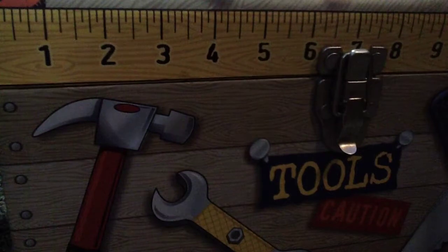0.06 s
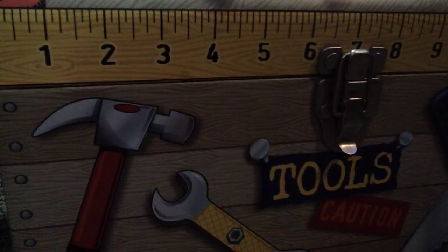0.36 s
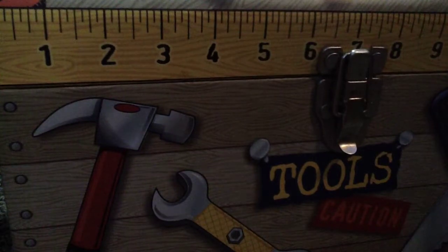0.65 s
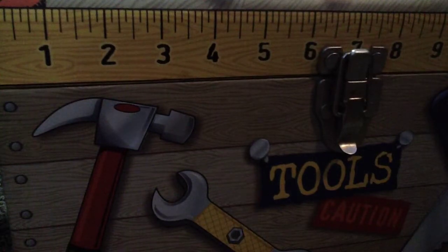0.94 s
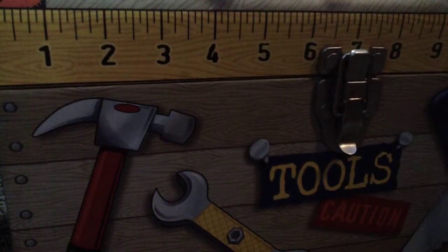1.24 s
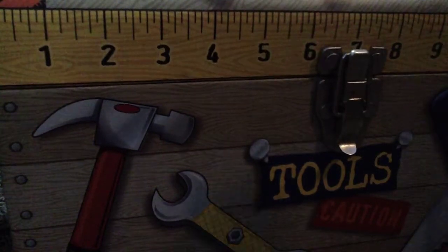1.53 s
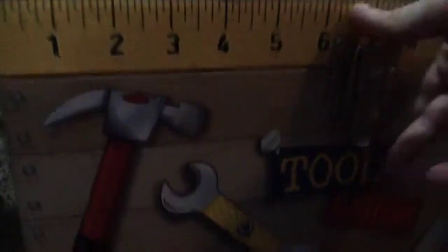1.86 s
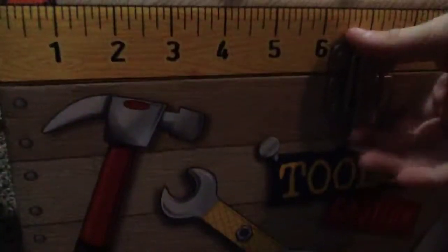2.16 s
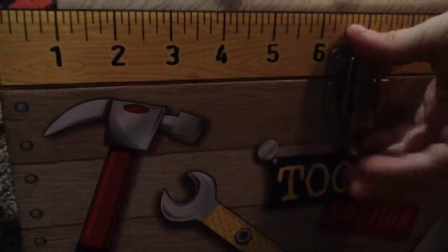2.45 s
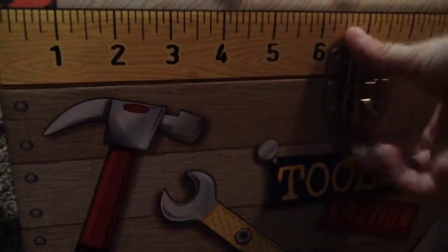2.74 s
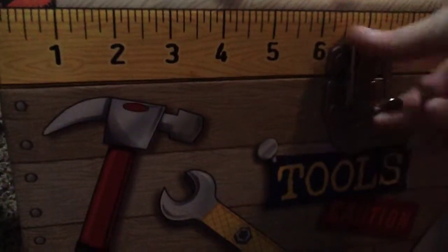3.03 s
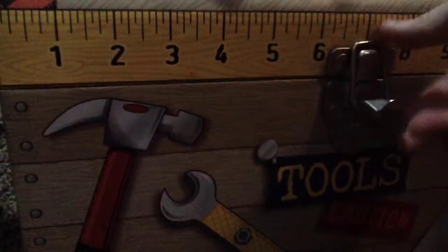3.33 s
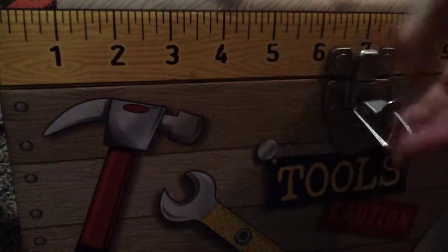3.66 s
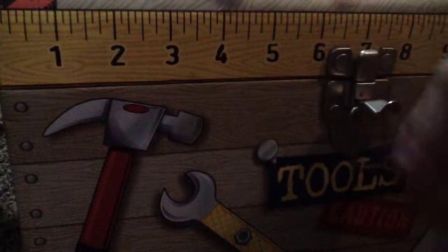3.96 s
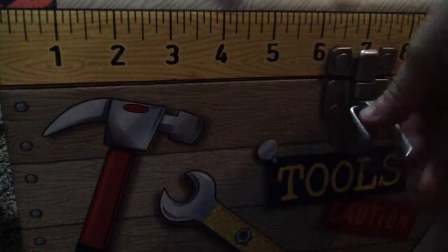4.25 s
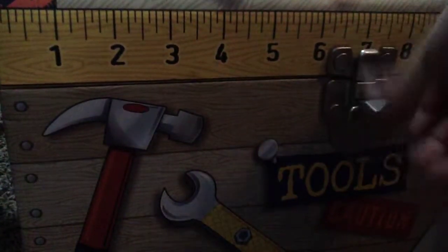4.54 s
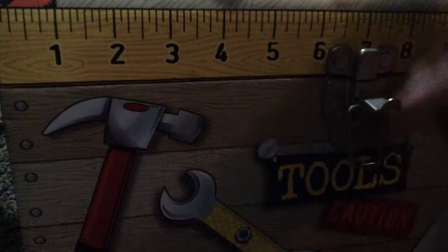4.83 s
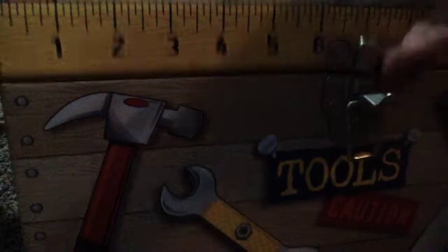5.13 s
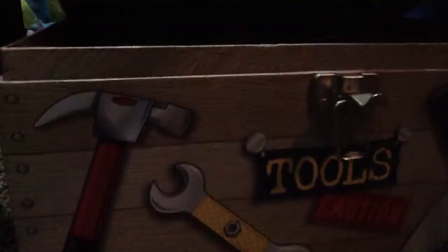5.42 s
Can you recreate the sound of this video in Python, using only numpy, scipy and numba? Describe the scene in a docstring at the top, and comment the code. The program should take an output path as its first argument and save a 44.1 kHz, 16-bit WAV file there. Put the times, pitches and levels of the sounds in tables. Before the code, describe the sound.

A low, steady hiss of a quiet room runs throughout, with very faint high whirs near the start and end. A hand bumps a hollow wooden box softly, most clearly at about 0.7 seconds. Around 1.7 seconds a tiny creak ends in a click from the box's metal latch. From 2.1 to 3.3 seconds fingers work the latch, making uneven damped ticks, short scrapes and rattles mixed with dull wooden knocks, busiest near 2.5 seconds. At 3.4 seconds the latch snaps free with a loud, sharp crack and a brief bright ring. After a few light ticks, two more loud snaps come close together at about 4.2 and 4.3 seconds. From 4.4 to 5 seconds there are softer clicks, bumps and a light brush of skin over the lid. A faint knock and rub follow near 5.4 seconds. Everything sounds close and dry.

```python
"""Steel latch on a wooden box

A hand works the draw latch of a toy box in a quiet room. Held by the fingers, the steel is damped: it
ticks, scrapes, rattles in its slack and creaks once by stick-slip. Snapping free, it rings in its modes.
These contacts also drive the panels and air of the hollow box. Soft knocks and a brush over the lid lie
between, above a hiss with faint whirs; a gain control ducks everything after the loudest snaps."""
import sys
import numpy as np
from scipy import signal
from scipy.fft import rfft, irfft
from scipy.io import wavfile
from numba import njit

SR = 44100
rng = np.random.default_rng(int(sys.argv[2]) if len(sys.argv) > 2 else 0)


def wrap_up_sound(samples):
    """Save the sound to the file named by the first command line argument, as 16-bit audio."""
    columns = np.atleast_2d(samples).T
    # keep every value between -1 and 1, then stretch to whole-number steps
    tamed = np.clip(columns, -1, 1)
    steps = np.round(tamed * 32767).astype(np.int16)
    wavfile.write(sys.argv[1], SR, steps)


N = 246444

# Spectral envelopes (f/Hz, relative level/dB)
HISS_SPECTRUM = [(15, -20), (25, -10.5), (180, -0.5), (326, 1), (394, -2.5), (607, -4.5), (1480, -9),
                 (2110, -10), (3160, -14), (4870, -10.5), (5880, -14.5), (6920, -10), (8140, -16.5),
                 (14800, -19.5), (16000, -32)]  # room and microphone noise
WHIR_SPECTRUM = [(2000, -2), (4000, -4), (4800, 3), (5800, -6), (7100, 3), (8600, -10), (9900, 7),
                 (10800, -20), (15000, -35)]  # faint high whir
RUB_SPECTRUM = [(60, -24), (130, -12), (200, 1.5), (330, -3.5), (450, -7.5), (800, -14), (1200, -28),
                (2500, -20.5), (6000, -61)]  # wood driven by friction
CLACK_SPECTRUM = [(300, -9), (520, -4), (660, -3.5), (740, -3), (860, -6), (1100, -12), (1700, -21)]  # wood struck by a hard edge
STEEL_SPECTRUM = [(900, -12.5), (1400, -9.5), (1950, -7), (2700, -0.5), (3200, -1.5), (4400, -3),
                  (5900, -6), (6750, 1), (8200, -8.5), (9900, -6.5), (11500, -12), (15500, -19)]  # steel under the fingers
SNAP_SPECTRUM = [(900, -9), (1400, -2.5), (1950, -12), (2600, 4), (3400, -8), (4400, -1.5), (5200, 2.5),
                 (5900, -6), (6700, 6), (8400, -12), (9500, -2.5), (11000, -15), (15500, -12.5)]  # crack of the free latch
# Skin sliding on wood (f/brightest frequency, relative level/dB)
SKIN_SPECTRUM = [(.25, -12.5), (.6, -6), (.95, 0.5), (1.3, -10.5), (2, -13)]
# Dead thud of a loaded panel (f/swing frequency, relative level/dB)
THUD_SPECTRUM = [(0.402, -18.5), (0.651, 7.5), (1, -2), (1.7, -6), (2.601, -12.5), (4.5, -41)]
# Modes of the panels and the enclosed air (f/Hz, relative level/dB, t60/s)
BOX_MODES = [(140, -8.5, 0.069), (187.1, -3, 0.19), (213.6, -2, 0.24), (302.8, 7.5, 0.085),
             (333.4, 3, 0.16), (437, -16, 0.25), (600, 0, .07), (780, -3.5, .06)]
# Modes of the steel lever and loop, whose two arms give close pairs (f/Hz, relative level/dB, t60/s)
LATCH_MODES = [(2600, -4, .17), (2715, -6, .11), (4300, -7, .11), (4883, -8, .12), (5030, -6, .14),
               (5550, -7, .12), (6520, -2, .05), (6787, 3, .1), (7434, -11, .11), (8880, -7, .11),
               (10250, -11, .12), (10537, -6.5, .22), (12308, -14.5, .23)]
# Runs of evenly spaced whirs (start t/s, end t/s, level/dB)
WHIR_RUNS = [(0.146, .6, -61), (0.839, 1.95, -62), (3.748, 4.0, -60), (5.085, 5.55, -61)]
# Hand, toys and lid bump the box (t/s, thump level/dB, thump f/Hz, clack level/dB, t60/cycles)
KNOCKS = [(0.542, -44.5, 189, -46, 8.2), (0.696, -23.5, 152.5, -44, 6.1), (1.076, -50, 173, -47, 10),
          (1.165, -42, 199, -51, 10), (1.3013, -36.5, 790, -41.5, 11), (1.557, -47.5, 343, -49, 13),
          (1.786, -26.5, 278, -48.5, 13), (2.129, -27, 207, -38, 9.8), (2.361, -23, 174, -25.5, 8.3),
          (2.4665, -24.5, 217, -32.5, 4.2), (3.1034, -44, 344, -42, 13), (3.661, -29, 376, -41.5, 21),
          (3.934, -41.5, 320, -57, 15), (4.43, -27.5, 344, -27.5, 17), (4.678, -38.5, 286, -52.5, 34),
          (4.792, -22, 178, -43, 4.6), (4.864, -29, 310, -43, 4.2), (4.8936, -25.5, 234, -42, 7),
          (5.028, -36.5, 264, -43.5, 12), (5.36, -37.5, 209, -47.5, 5.9)]
# Strokes of the hand on the lid (centre t/s, Gaussian width/s, level/dB, brightest f/Hz)
BRUSHES = [(4.786, 0.024, -44, 7800), (4.836, 0.022, -44, 10000), (4.887, 0.013, -41.5, 7750),
           (4.97, .03, -49.5, 7300)]
# Fingers, latch and lid slide (start t/s, end t/s, hiss level/dB, tilt/(dB/octave), wood level/dB)
SCRAPES = [(2.112, 2.13, -56.5, -1.5, -47), (2.186, 2.32, -66, -7.5, -57), (2.353, 2.391, -43, 1.5, -35),
           (2.458, 2.489, -34, -1, -25), (2.665, 2.697, -36.5, -4.5, -57),
           (3.216, 3.289, -47.5, -0.5, -41.5), (3.336, 3.405, -47.5, -9, -42),
           (4.103, 4.201, -44, -5, -39.5), (4.423, 4.658, -54.5, 3.5, -50.5),
           (4.677, 4.769, -53.5, -6, -40.5), (4.756, 4.93, -53, 2, -40.5), (4.882, 4.921, -42, -4, -31),
           (4.942, 5.055, -60, 4, -42), (5.341, 5.658, -57, -8.5, -53)]
# Short, damped ticks of the latch and toys
# (t/s, click level/dB, contact f/Hz, treble edge f/Hz, thump level/dB, thump f/Hz)
TICKS = [(.637, -39.5, 1880, 7100, -50.5, 626), (1.7263, -23, 7160, 11500, -38.5, 370),
         (1.786, -41.5, 6540, 9000, -41, 293), (2.1292, -39.5, 3900, 8800, -30.5, 386),
         (2.366, -34.5, 8600, 18000, -44, 575), (2.374, -39.5, 7700, 17000, -34, 420),
         (2.4391, -44, 3800, 8000, -43, 440), (2.451, -42, 3020, 9000, -52, 437),
         (2.459, -26, 7500, 8160, -36, 403), (2.469, -18, 7160, 13200, -22, 566),
         (2.47, -19.5, 6700, 13000, -38.5, 417), (2.481, -29, 3600, 10000, -40.5, 290),
         (2.609, -22, 6760, 8000, -41, 510), (2.62, -32.5, 4630, 11000, -32.5, 344),
         (2.675, -32, 6570, 8500, -32.5, 386), (2.685, -19.5, 6540, 11800, -27, 395),
         (2.7754, -35, 6600, 6770, -46, 345), (2.8066, -40, 6640, 9200, -40, 367),
         (2.824, -41, 2790, 13000, -40.5, 280), (2.9027, -38.5, 6770, 7500, -51.5, 315),
         (2.9163, -38.5, 6430, 7600, -54.5, 336), (3.0306, -35, 5650, 9100, -30.5, 316),
         (3.0686, -42, 3120, 9900, -42, 350), (3.164, -37.5, 4930, 15300, -42, 492),
         (3.193, -43.5, 3450, 8400, -37.5, 420), (3.235, -34.5, 3500, 11100, -36.5, 353),
         (3.256, -32, 6600, 15000, -40, 410), (3.2793, -18, 5370, 16500, -25, 516),
         (3.342, -42, 6900, 9700, -34.5, 317), (3.6184, -30, 5800, 14000, -35, 480),
         (3.6459, -34, 2760, 11000, -31.5, 300), (3.9617, -42, 3400, 15000, -34, 342),
         (4.1037, -42, 3050, 8500, -40, 460), (4.1257, -36.5, 3740, 15000, -39, 326),
         (4.2715, -20.5, 7870, 9900, -30, 500), (4.282, -27, 6860, 11000, -30.5, 376),
         (4.424, -30, 3380, 9800, -35, 466), (4.4295, -33.5, 5130, 9000, -38, 446),
         (4.509, -28.5, 4810, 8800, -34, 456), (4.908, -27.5, 1600, 1880, -28, 315),
         (4.912, -29.5, 5800, 10900, -28.5, 288), (4.917, -35, 5450, 11000, -29.5, 320),
         (4.959, -32.5, 5670, 9900, -33, 364), (4.963, -35, 5520, 13000, -39, 412),
         (4.9924, -27.5, 5700, 11000, -32.5, 376), (5.3773, -48, 4400, 10100, -46, 378)]
# The latch strikes its stop
# (t/s, crack level/dB, ring level/dB, t60 multiplier, thump level/dB, thump f/Hz, clack level/dB)
SNAPS = [(3.4141, -6.5, -30, 1.08, -26.5, 232, -15.5), (4.187, -7, -16.5, 0.47, -24, 271, -16.5),
         (4.3, -8.5, -26, 0.59, -28, 256, -17.5)]

AGE = np.arange(int(.35 * SR)) / SR  # time since a blow, t/s
CRACK_S, CLACK_S, THUMP_S = .004, .006, .013  # opening spans over which a blow's rms level is set


def undb(db):
    """Amplitude ratio of a level in decibels."""
    return 10 ** (np.asarray(db) / 20)


def fade(t60):
    """Exponential damping: the amplitude falls 60 dB in t60 seconds."""
    return np.exp(-np.log(1000) * AGE / t60)


def unit(x, seconds):
    """Normalisation to rms 1 over the first seconds."""
    return x / np.sqrt(np.mean(x[:int(seconds * SR)] ** 2) + 1e-18)


def add(track, s, x):
    """Superposition: x joins the track from time s on."""
    i = max(int(s * SR), 0)
    track[i:i + len(x)] += x[:max(N - i, 0)]


def wander(n, step_s, spread_db):
    """Random amplitude modulation: a gain that drifts between levels."""
    knots = np.arange(0, n / SR + step_s, step_s)
    return undb(spread_db * np.interp(np.arange(n) / SR, knots, rng.standard_normal(len(knots))))


def colour(x, spectrum, tilt=0):
    """Minimum-phase filtering by a spectrum (f/Hz, level/dB), tilted in dB per octave."""
    hz, db = np.transpose(spectrum)
    octave = np.log2(np.maximum(np.fft.rfftfreq(4096, 1 / SR), 1))
    knots = np.log2(hz)
    in_band = np.clip(octave, knots[0], knots[-1])
    shape_db = np.interp(octave, knots, db) + tilt * (in_band - knots.mean())
    shape_db -= 18 * np.abs(octave - in_band)  # roll-off beyond both ends
    cepstrum = irfft(np.log(undb(shape_db) + 1e-5))
    half = len(cepstrum) // 2
    causal = np.r_[cepstrum[0], 2 * cepstrum[1:half], np.zeros(half)]
    response = irfft(np.exp(rfft(causal)))[:half]
    return signal.fftconvolve(x, response)[:len(x)]


@njit
def follow(x, attack, release):
    """Envelope detection: rectify, then smooth at separate rates for rise and fall."""
    envelope, level = np.empty(len(x)), 0.
    for i in range(len(x)):
        level += (abs(x[i]) - level) * (attack if abs(x[i]) > level else release)
        envelope[i] = level
    return envelope


def ring(modes, scatter_db, cutoff_hz, sustain=1, detune=0):
    """Free vibration: modal levels vary with the point struck, and a soft contact misses high modes."""
    out = 0
    for hz, db, t60 in modes:
        gain = undb(db + scatter_db * rng.standard_normal()) / (1 + (hz / cutoff_hz) ** 4)
        pitch = hz * (1 + detune * rng.standard_normal())  # the grip shifts a mode a little
        out += rng.choice([-1, 1]) * gain * fade(t60 * sustain) * np.sin(2 * np.pi * pitch * AGE)
    return out


def crack(spectrum, tilt, t60, chatter):
    """Impact excitation: one impulse and the dense micro-bounces after it."""
    force = chatter * rng.standard_normal(len(AGE)) * fade(t60)
    force[0] += 1
    return colour(force, spectrum, tilt)


def slips(n, per_s, spread_db):
    """Friction as a Poisson process: many weak slips, a few strong."""
    size = undb(spread_db * np.minimum(rng.exponential(size=n), 3))
    return (rng.random(n) < per_s / SR) * size * rng.choice([-1, 1], n)


def room_hiss(level_db=-57.5):
    """Broadband noise of room and microphone, wavering a little."""
    waver = wander(N, step_s=.08, spread_db=.7)
    return undb(level_db) * waver * unit(colour(rng.standard_normal(N), HISS_SPECTRUM), N / SR)


def whirs(step_s=.214, width_s=.02, scatter_db=2):
    """Pulsed resonant noise: faint high whirs in even steps, as of a lens refocusing."""
    t = np.arange(N) / SR
    swell = np.zeros(N)
    for start, end, db in WHIR_RUNS:
        for s in np.arange(start, end, step_s):
            swell += undb(db + scatter_db * rng.standard_normal()) * np.exp(-.5 * ((t - s) / width_s) ** 2)
    return swell * unit(colour(rng.standard_normal(N), WHIR_SPECTRUM), N / SR)


def room(x, early_db=-13, early_t60=0.071, late_db=-21, late_t60=0.2):
    """Reverberation: near surfaces reflect within milliseconds; a carpeted room leaves a short tail."""
    response = 0
    for db, t60 in (early_db, early_t60), (late_db, late_t60):
        echoes = rng.standard_normal(len(AGE)) * fade(t60) * (1 - fade(0.051)) * (AGE > .003)
        response += undb(db) * echoes / np.linalg.norm(echoes)
    return x + signal.fftconvolve(x, response)[:N]


def wood(thump_db, hz, clack_db, clack_tilt=0, cycles=12, rise_cycles=3, thud_db=-7, body_db=-10):
    """Panel radiation: struck wood thuds and swings, the box resonates, a hard edge adds a clack."""
    displacement = np.sin(2 * np.pi * hz * AGE) * fade(cycles / hz) * (1 - fade(rise_cycles / hz))
    swing = unit(np.gradient(displacement), THUMP_S)  # a panel radiates through its velocity
    thud = crack([(hz * ratio, db) for ratio, db in THUD_SPECTRUM], tilt=0, t60=0.041, chatter=0.27)
    bass_loss = signal.butter(3, 135, "high", fs=SR, output="sos")  # a small box radiates little bass
    thud = unit(signal.sosfilt(bass_loss, thud), THUMP_S)
    body = ring(BOX_MODES, scatter_db=1, cutoff_hz=1.4 * hz, detune=0.021) * (1 - fade(0.014))
    thump = swing + undb(thud_db) * thud + undb(body_db) * unit(body, THUMP_S)
    clack = crack(CLACK_SPECTRUM, clack_tilt, t60=0.02, chatter=0.26)
    return undb(thump_db) * unit(thump, THUMP_S) + undb(clack_db) * unit(clack, CLACK_S)


def knocks(bump_every_s=0.29, bump_db=-57, bump_hz=220, bump_clack_db=-66, bump_cycles=11):
    """Soft impacts carry little treble: dull knocks on the box, with faint random bumps of handling."""
    bumps = []
    for slot in np.arange(0, N / SR - bump_every_s, bump_every_s):
        s = slot + bump_every_s * rng.random()
        db = bump_db + 2 * rng.standard_normal()
        hz = bump_hz * 2 ** (0.3 * rng.standard_normal())
        bumps.append((s, db, hz, bump_clack_db, bump_cycles))
    out = np.zeros(N)
    for s, thump_db, hz, clack_db, cycles in list(KNOCKS) + bumps:
        add(out, s, wood(thump_db, hz, clack_db, clack_tilt=-6, cycles=cycles))
    return out


def brushes():
    """Sliding friction: skin crosses the grain of the lid in swells of gritty hiss."""
    t = np.arange(N) / SR
    out = np.zeros(N)
    for s, width_s, db, hz in BRUSHES:
        force = slips(N, per_s=2200, spread_db=4.5)
        spectrum = [(hz * ratio, level) for ratio, level in SKIN_SPECTRUM]
        swell = np.exp(-.5 * ((t - s) / width_s) ** 2)
        out += undb(db) * swell * unit(colour(force, spectrum), N / SR)
    return out * wander(N, step_s=.003, spread_db=3.5)


def scrapes(short_grit=0.59, glide_s=0.32, smooth_weight=0.09):
    """Stick-slip friction: tiny slips over a smooth rub excite steel and wood together."""
    out = np.zeros(N)
    for start, end, hiss_db, tilt, wood_db in SCRAPES:
        length = max(end - start, .02)
        n = int(length * SR)
        grit = short_grit / (1 + (length / glide_s) ** 4)  # short rubs catch, long strokes glide
        pressure = signal.windows.cosine(n) * wander(n, step_s=0.01, spread_db=4)
        friction = grit * slips(n, per_s=500, spread_db=2.5) + smooth_weight * rng.standard_normal(n)
        force = np.r_[pressure * friction, np.zeros(len(AGE))]
        hiss = unit(colour(force, STEEL_SPECTRUM, tilt), length)
        rub = unit(colour(force, RUB_SPECTRUM), length)
        add(out, start, undb(hiss_db) * hiss + undb(wood_db) * rub)
    return out


def tick(db, contact_hz, edge_hz, thump_db, thump_hz, ping_db=-9, tone_db=-12):
    """Damped impact: one chattering contact excites steel and wood; the fingers choke the ring."""
    steel_hz, steel_db = np.transpose(STEEL_SPECTRUM)
    hz = np.geomspace(steel_hz[0], steel_hz[-1], 60)
    resonance_db = 6 * np.exp(-(np.log2(hz / contact_hz) / 0.16) ** 2)  # of the small part struck
    treble_loss_db = 10 * np.log10(1 + (hz / edge_hz) ** 8)  # a longer contact has a lower edge
    spectrum = np.c_[hz, np.interp(hz, steel_hz, steel_db) + resonance_db - treble_loss_db]
    tilt = -1.05 + 2.3 * np.log2(contact_hz / 5460)  # a smaller, harder contact is brighter
    strike = unit(crack(spectrum, tilt, t60=0.015, chatter=0.56), CRACK_S)
    tone = unit(ring(LATCH_MODES, scatter_db=4, cutoff_hz=edge_hz, sustain=0.077), CRACK_S)
    ping = unit(np.sin(2 * np.pi * contact_hz * AGE) * fade(.011), CRACK_S)
    click = unit(strike + undb(ping_db) * ping + undb(tone_db) * tone, CRACK_S)
    clack_db = (db + thump_db) / 2 - 8.5
    panel = wood(thump_db, thump_hz, clack_db, cycles=12.5, thud_db=-4.5, body_db=-3.5)
    return undb(db) * click + panel


def creak(start_s=1.6543, end_s=1.72, first_gap_s=.0215, quicken=.75, weaken=0.63):
    """Relaxation oscillation: slips quicken as the load grows; a shorter wait stores less force."""
    out = np.zeros(N)
    gaps = first_gap_s / np.arange(1, 9) ** quicken
    for s, gap in zip(start_s + np.r_[0, np.cumsum(gaps)], gaps):
        if s < end_s:
            slip = tick(db=-45.5, contact_hz=1520, edge_hz=2070, thump_db=-42.5, thump_hz=454)
            add(out, s, (gap / first_gap_s) ** weaken * slip)
    return out


def ticks(onset_s=0.0037, onset_db=-17):
    """Damped transients of latch and toys; a few milliseconds of faint rising noise soften each start."""
    out = np.zeros(N)
    n = int(onset_s * SR)
    for s, db, contact_hz, edge_hz, thump_db, thump_hz in TICKS:
        onset = unit(colour(rng.standard_normal(n), STEEL_SPECTRUM, tilt=-4), onset_s)
        add(out, s - onset_s, undb(db + onset_db) * onset * np.linspace(0, 1, n))
        add(out, s, tick(db, contact_hz, edge_hz, thump_db, thump_hz))
    return out


def snaps():
    """Impact and free decay: the latch hits its stop and rings; the screws pass the blow to the wood."""
    out = np.zeros(N)
    for s, crack_db, ring_db, sustain, thump_db, thump_hz, clack_db in SNAPS:
        strike = unit(crack(SNAP_SPECTRUM, tilt=0, t60=0.012, chatter=0.31), CRACK_S)
        tone = unit(ring(LATCH_MODES, scatter_db=1.5, cutoff_hz=25000, sustain=sustain), CRACK_S)
        panel = wood(thump_db, thump_hz, clack_db, clack_tilt=1.7)
        add(out, s, undb(crack_db) * strike + undb(ring_db) * tone + panel)
    return out


def scene():
    """Superposition: latch and box sound in the room, over the hiss and whirs."""
    contacts = ticks() + snaps() + knocks() + scrapes() + brushes() + creak()
    return (room(contacts) + room_hiss() + whirs())[None]


def record(dry, threshold_db=-23, slope=0.92, deepest_db=-8, attack_s=0.0061, release_s=0.87):
    """Compression and band limiting: bass is cut, gain ducks after loud snaps, the top is cut."""
    low_cut = signal.butter(3, 75, "high", fs=SR, output="sos")
    high_cut = signal.ellip(10, .2, 80, 15900, fs=SR, output="sos")
    x = signal.sosfilt(low_cut, dry[0])
    envelope = follow(x, 1 / (attack_s * SR), 1 / (release_s * SR))
    excess = np.maximum(envelope / undb(threshold_db), 1)
    gain = np.maximum(excess ** -slope, undb(deepest_db))
    limited = np.clip(x * gain, -.76, .76)
    return signal.sosfilt(high_cut, limited)[None]


dry = scene()
out = record(dry)
wrap_up_sound(out)
```